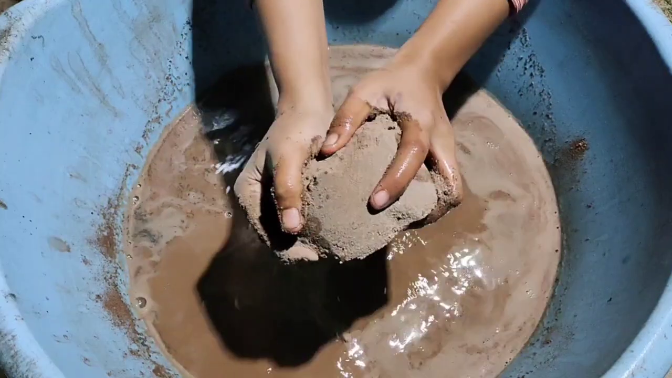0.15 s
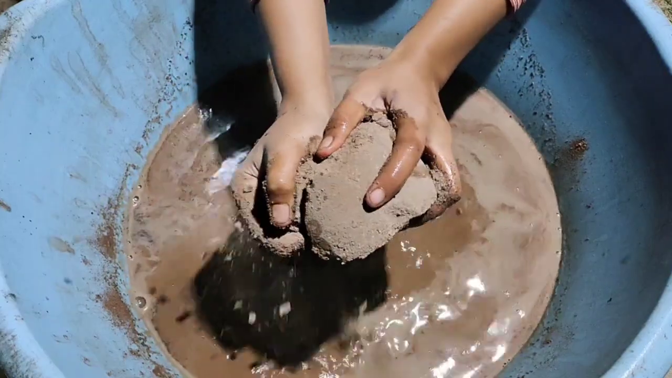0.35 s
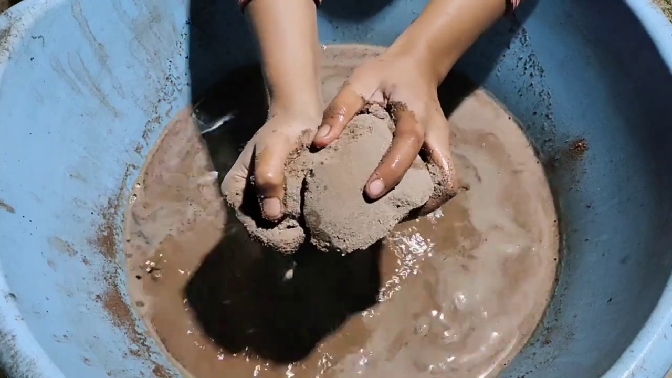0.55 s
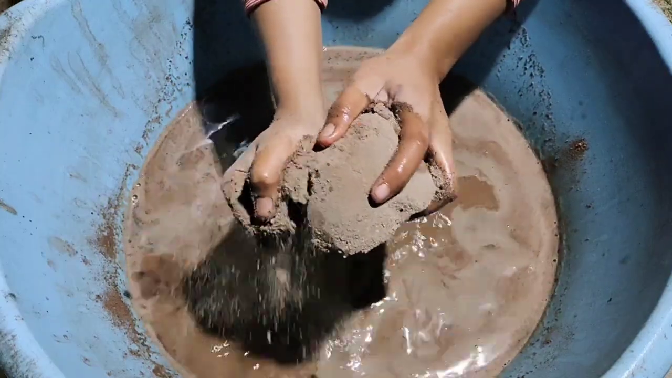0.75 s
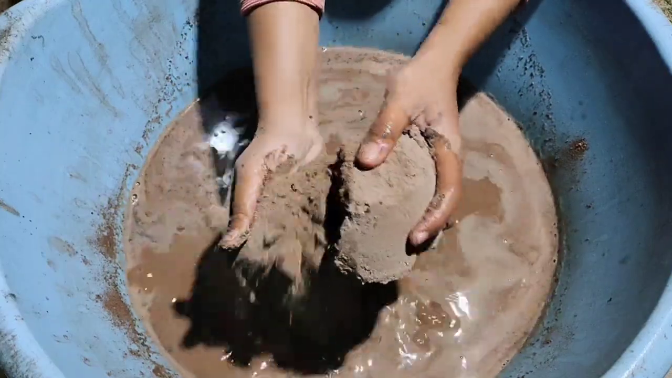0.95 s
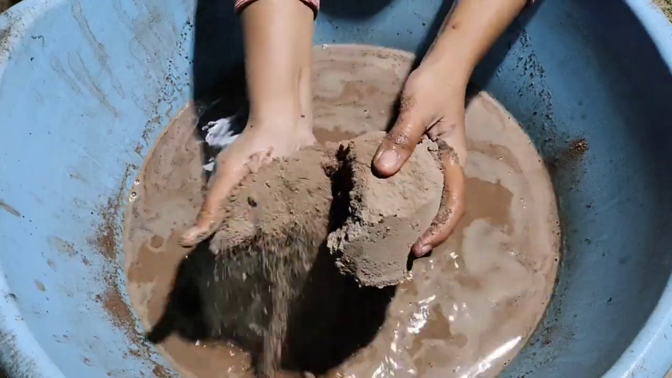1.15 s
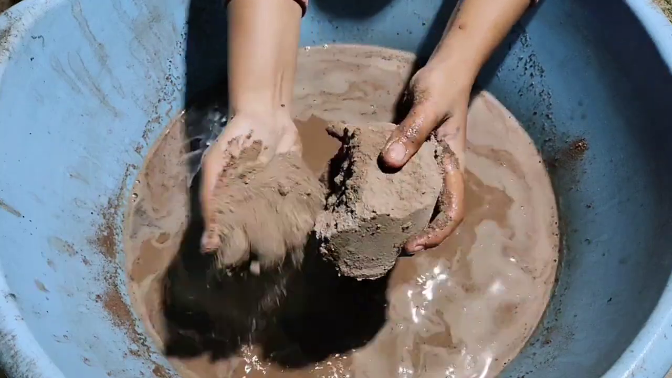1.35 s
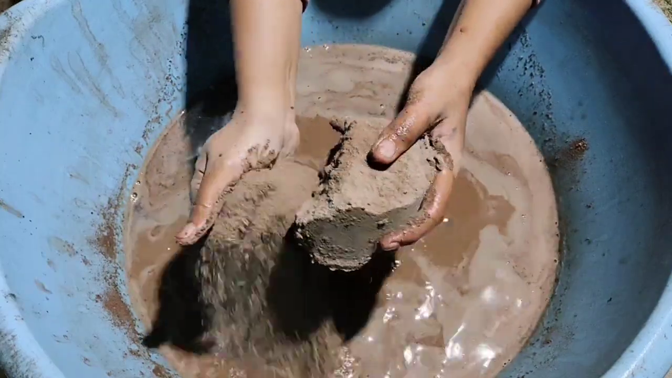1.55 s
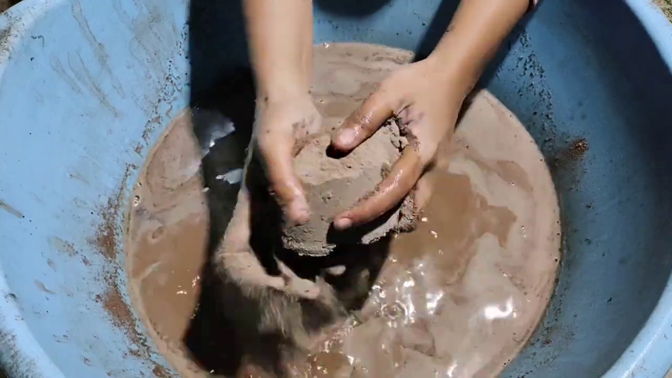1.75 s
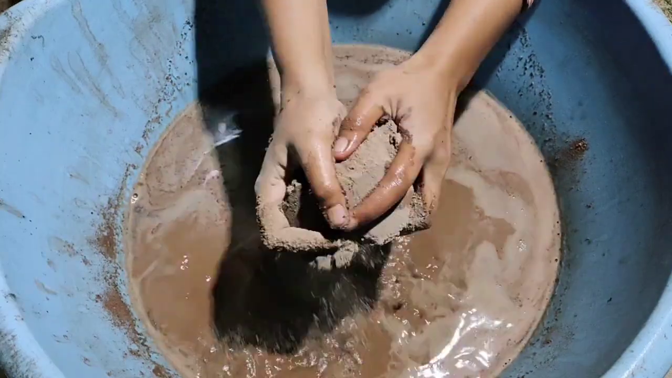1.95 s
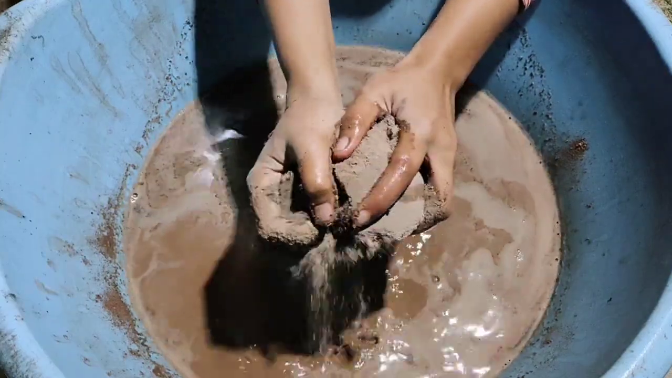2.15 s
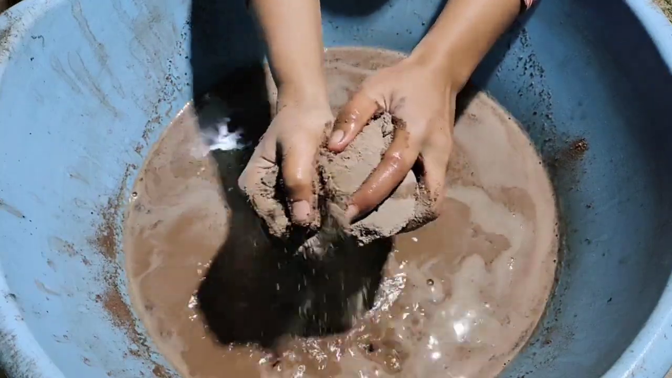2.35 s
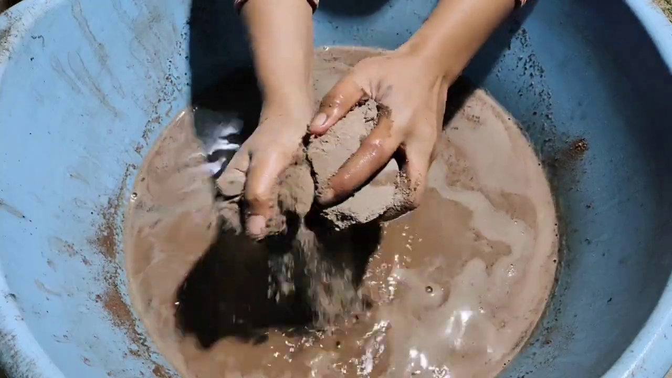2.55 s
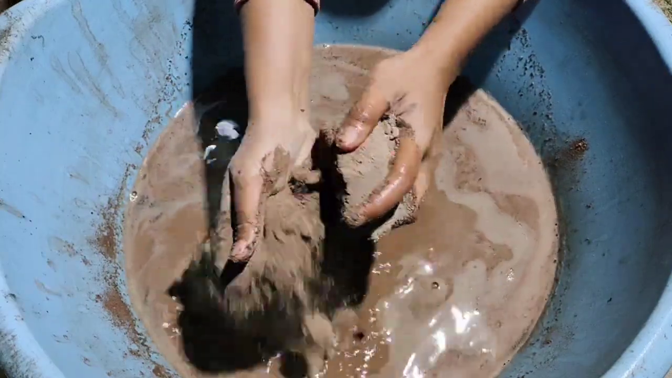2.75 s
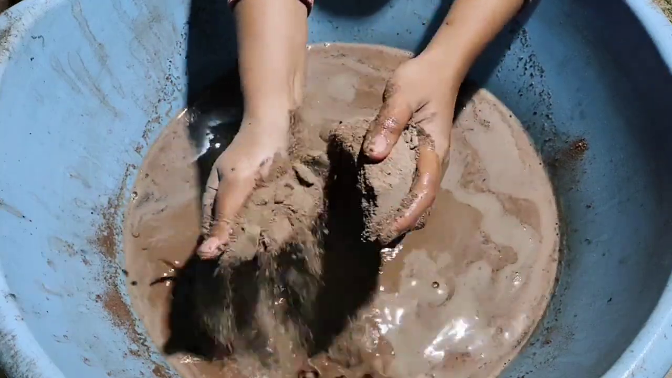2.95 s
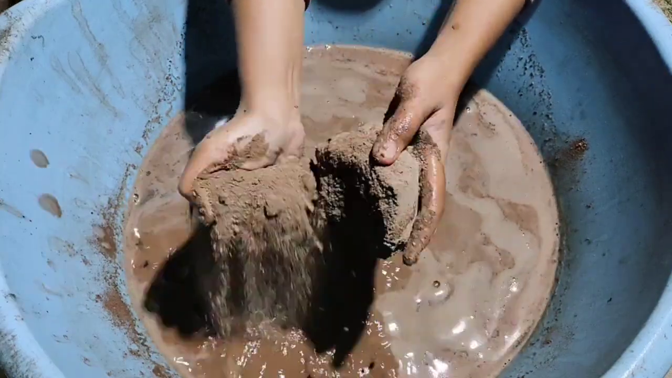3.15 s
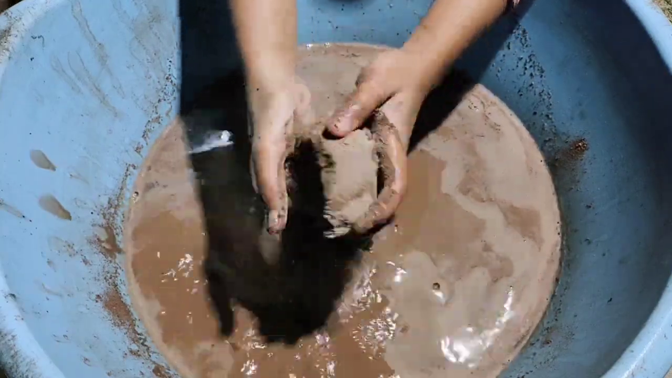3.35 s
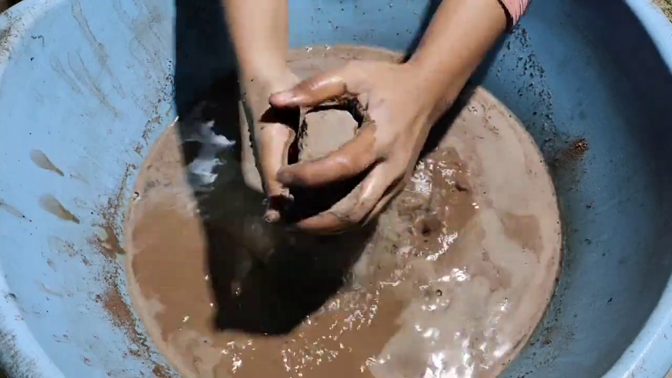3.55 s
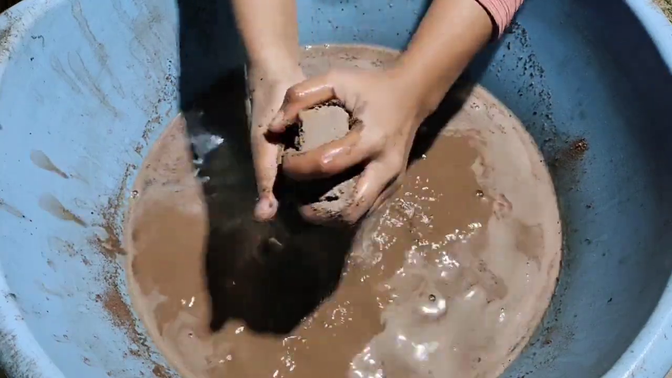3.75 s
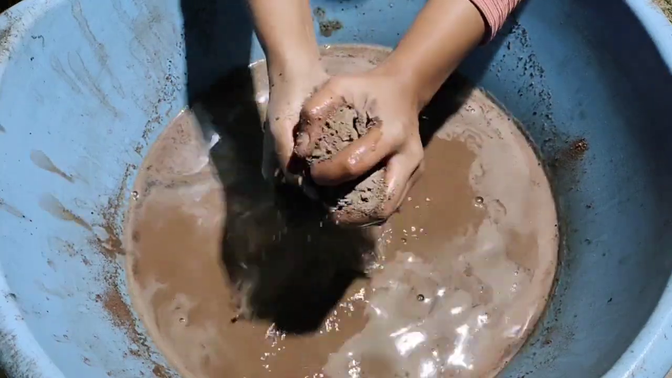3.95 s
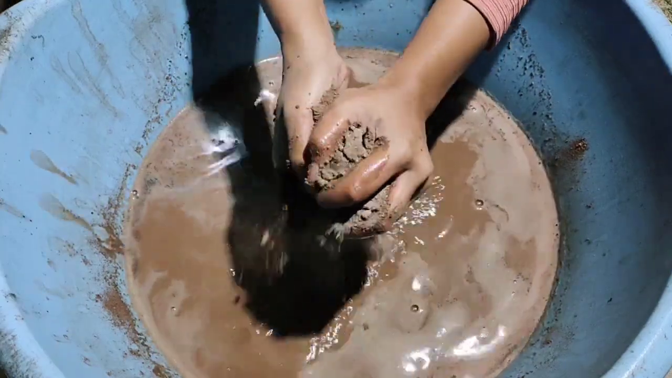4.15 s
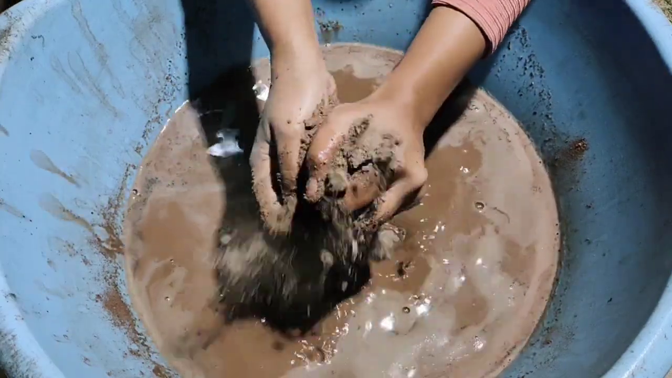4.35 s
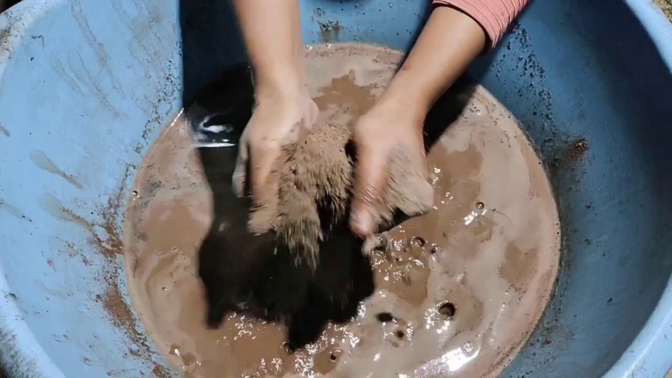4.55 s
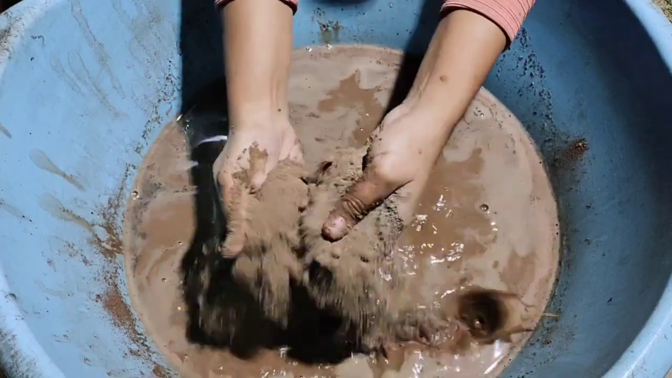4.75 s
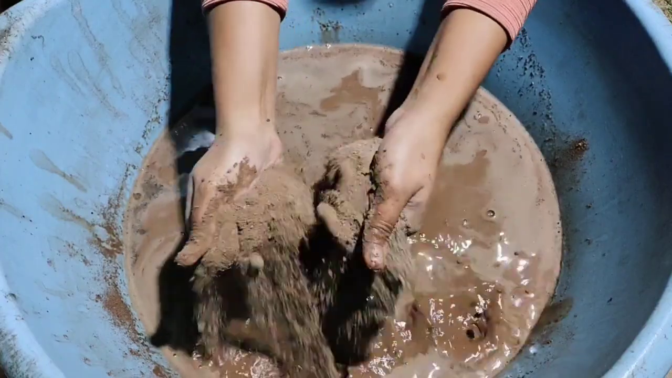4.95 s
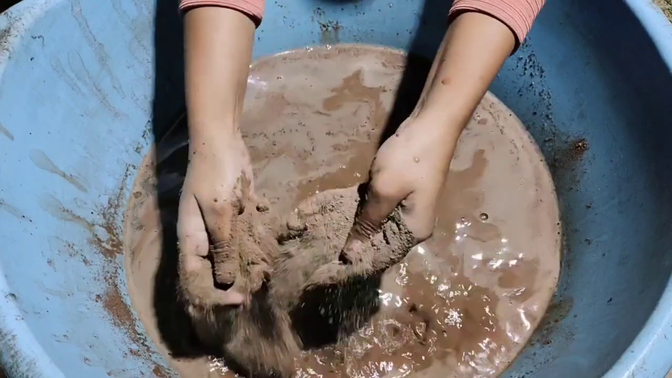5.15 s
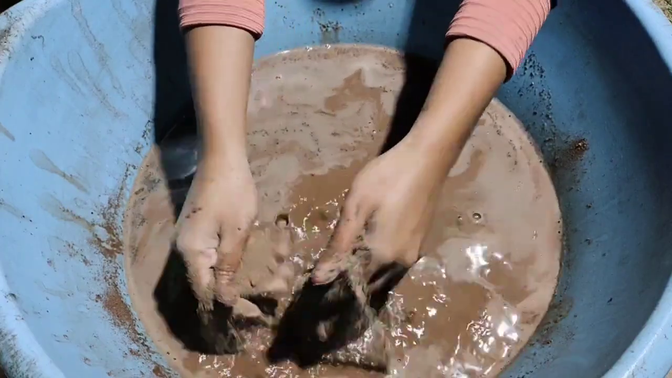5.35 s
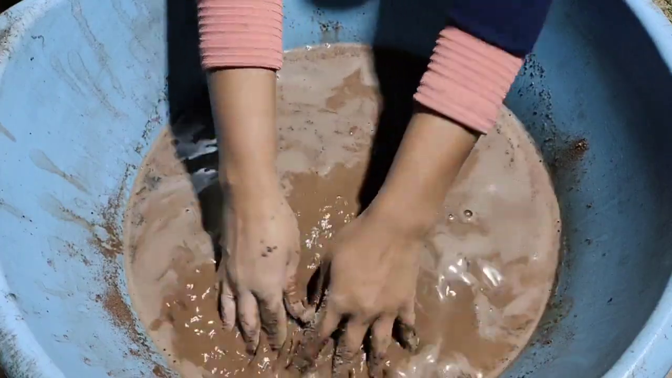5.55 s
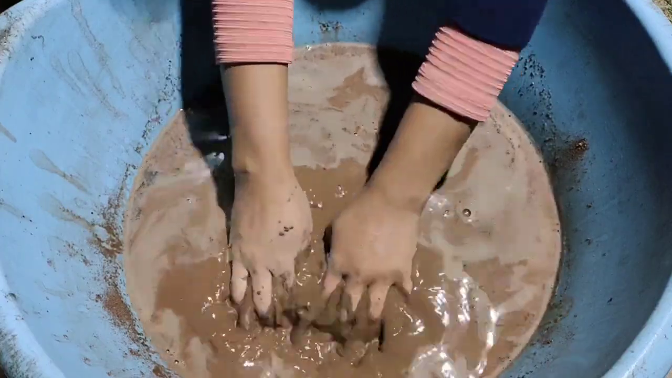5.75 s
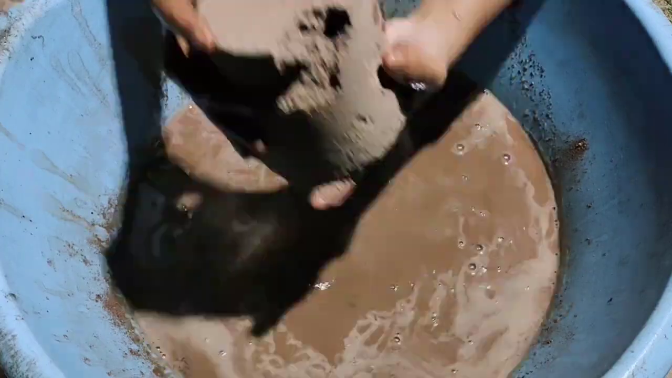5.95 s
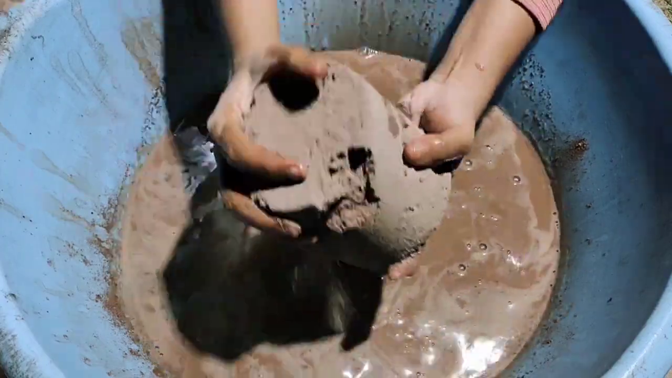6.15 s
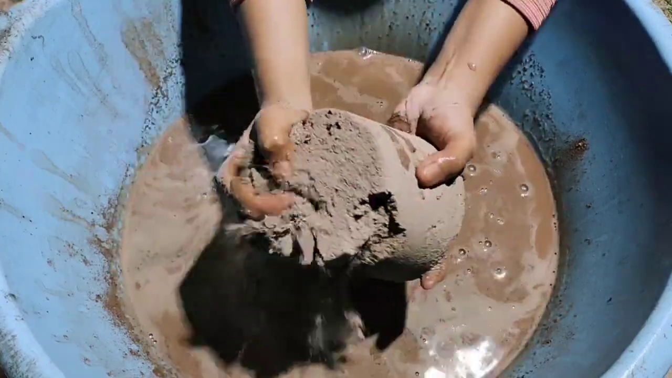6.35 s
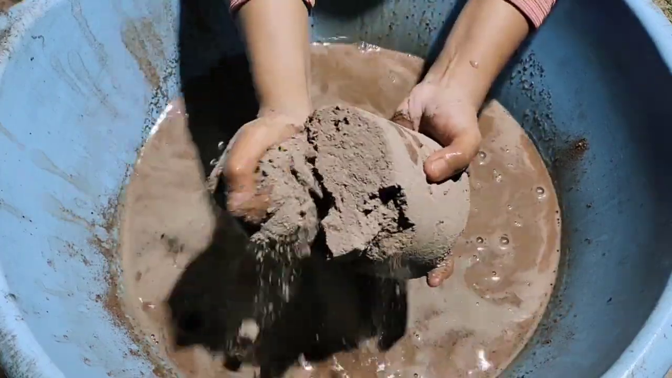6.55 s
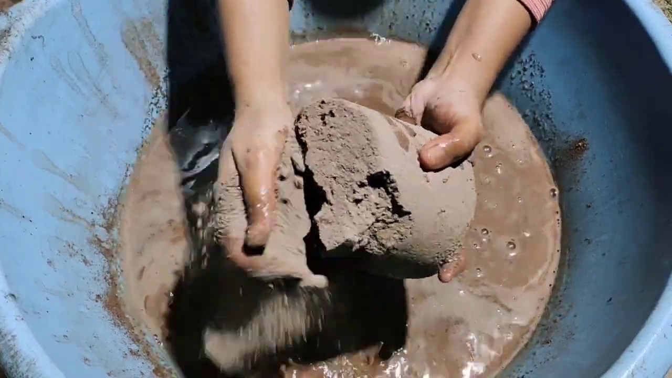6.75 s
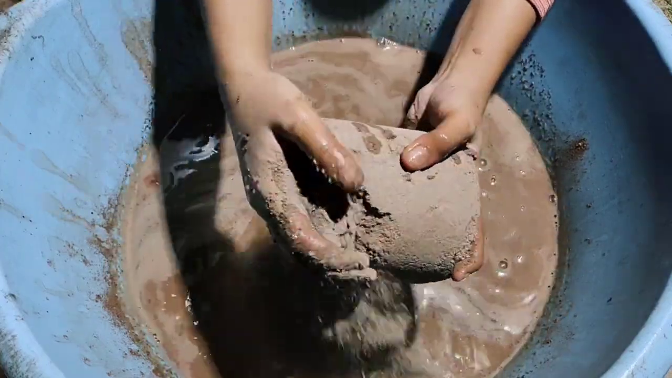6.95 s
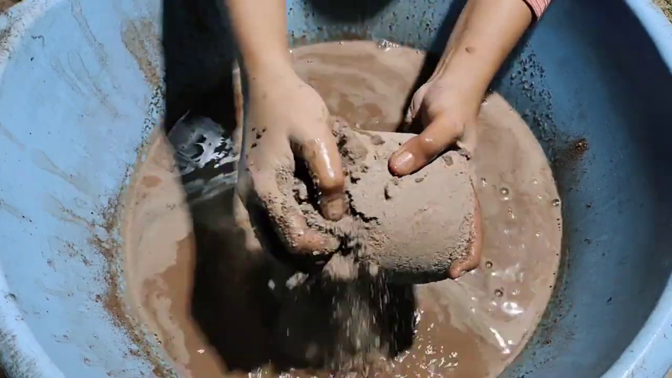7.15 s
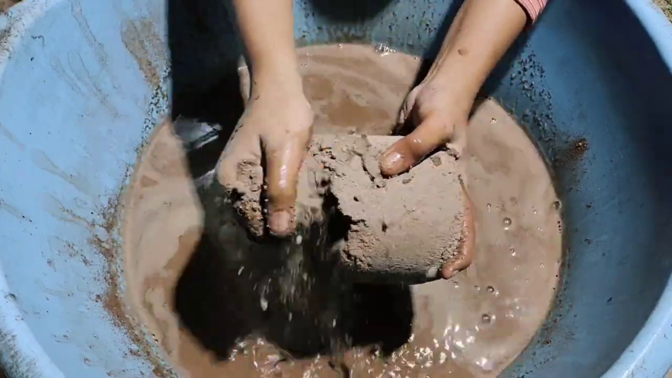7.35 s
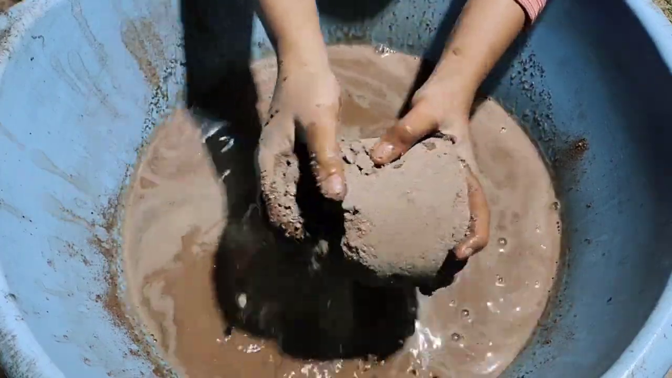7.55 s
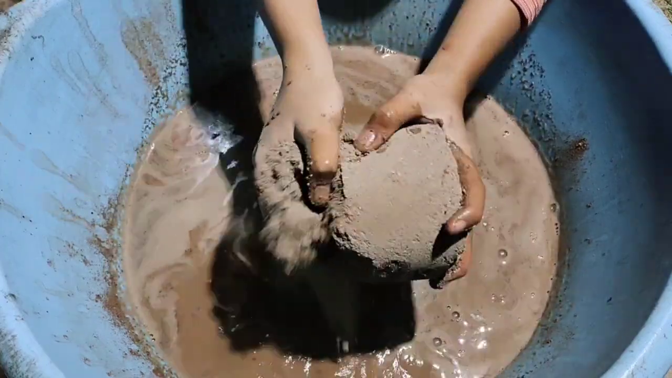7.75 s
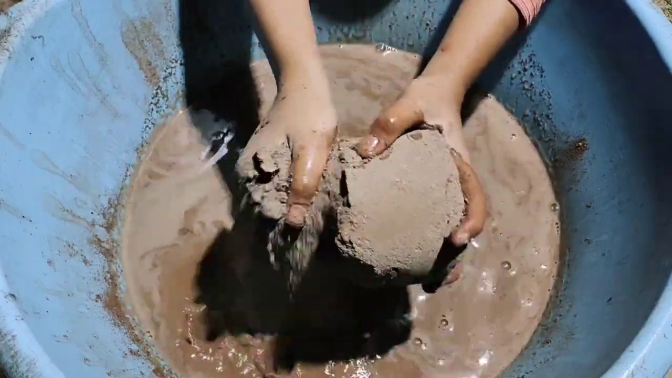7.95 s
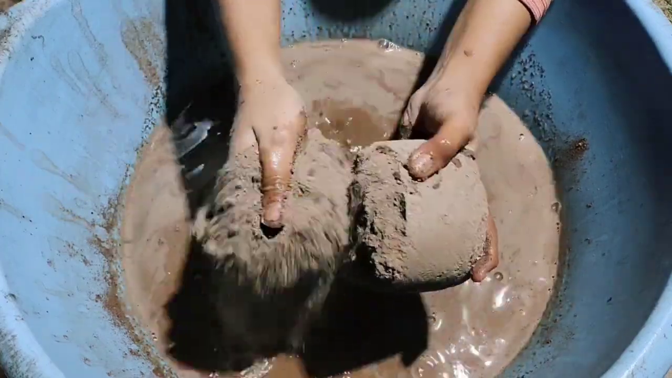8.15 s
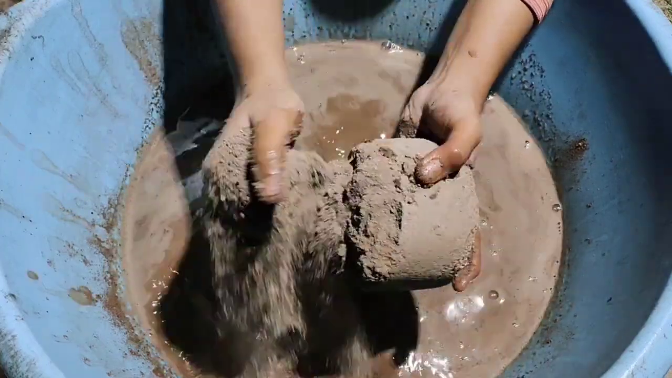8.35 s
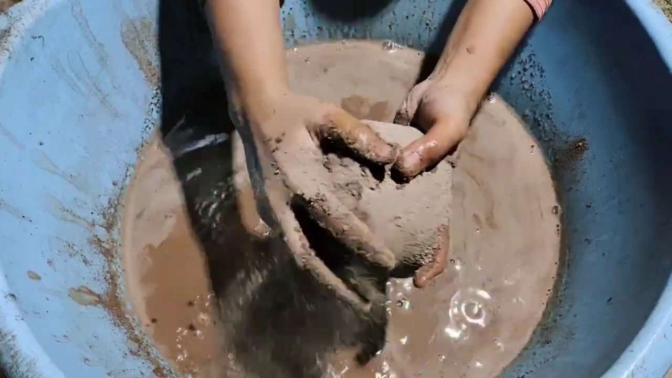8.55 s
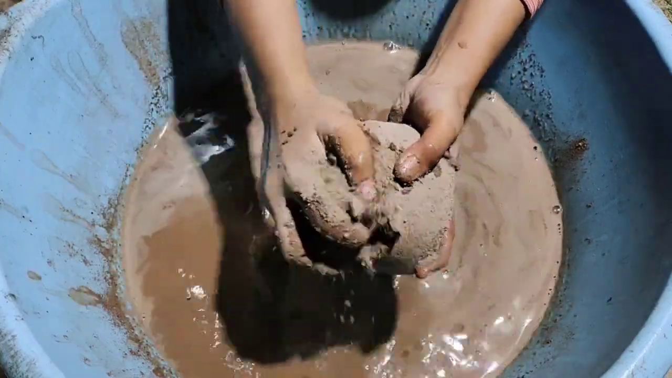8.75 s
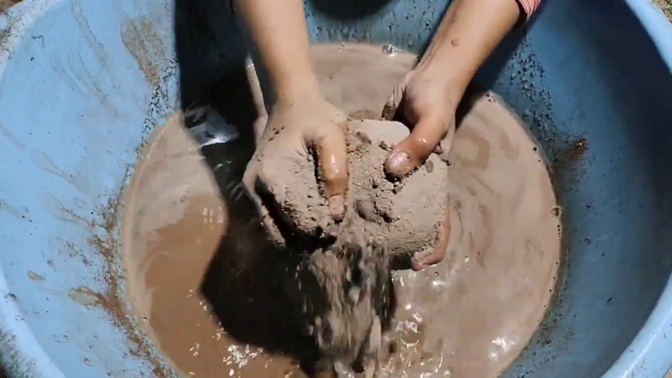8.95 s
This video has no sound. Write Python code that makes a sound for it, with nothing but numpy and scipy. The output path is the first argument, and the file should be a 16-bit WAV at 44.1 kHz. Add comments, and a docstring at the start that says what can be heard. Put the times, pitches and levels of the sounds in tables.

```python
"""Hands crumble lumps of sandy soil over a plastic basin of muddy water, outdoors, near a small microphone.
Sand rasps, slides and cracks in the fingers. Clods plop into the water, crumbs patter on it and trapped
air blips as bubbles; the crumbs and cracks make the basin ring. Once, the hands churn through the water.
A distant rumble, faint air hiss and, at first, a fading engine hum lie underneath."""
import sys
import numpy as np
from scipy import signal
from scipy.fft import rfft, irfft
from scipy.io import wavfile

SR = 44100
rng = np.random.default_rng(int(sys.argv[2]) if len(sys.argv) > 2 else 0)


def transcribe(signal):
    """Save signal, clipped to [-1, 1], as a 16-bit WAV file at the path in sys.argv[1]."""
    frames = np.atleast_2d(signal).T
    limited = np.clip(frames, -1, 1)
    pcm = np.round(limited * 32767).astype(np.int16)
    wavfile.write(sys.argv[1], SR, pcm)


N = 396900
NOW = np.arange(N) / SR


def amp(db):
    return 10 ** (np.asarray(db) / 20)


def rms_one(x):
    return x / np.sqrt(np.mean(x ** 2) + 1e-20)


def columns(table):
    return (column[:, None] for column in np.transpose(table))


def band(x, low_hz, high_hz):
    return signal.sosfilt(signal.butter(2, [low_hz, high_hz], "band", fs=SR, output="sos"), x)


def drift(hz):
    """A smooth random wander of about 1 either way; more hz, faster wander."""
    r = np.exp(-2 * np.pi * hz / SR)
    return rms_one(signal.lfilter([1], [1, -2 * r, r * r], rng.standard_normal(N + SR))[SR:])


def coloured(x, spectrum):
    """Give a sound the tone of an (f/Hz, level/dB) table, at average strength 1."""
    hz, level_db = np.transpose(spectrum)
    grid = np.log(np.fft.rfftfreq(N, 1 / SR) + 1)
    return rms_one(irfft(rfft(x) * amp(np.interp(grid, np.log(hz), level_db)), N))


def ring(clicks, hz, ring_s):
    """Each click starts a tone that fades by 60 dB in ring_s."""
    r, w = amp(-60 / (ring_s * SR)), 2 * np.pi * hz / SR
    return signal.lfilter([0, np.sin(w)], [1, -2 * r * np.cos(w), r * r], clicks + 1e-18)


def grains(per_s, spread_db):
    """Random clicks: many small, a few large."""
    sizes = amp(spread_db * np.minimum(rng.exponential(1, N), 3.5)) * rng.choice([-1, 1], N)
    return sizes * (rng.random(N) < per_s / SR)


def place(times, shapes):
    """Lay one short sound at each time."""
    out = np.zeros(N + shapes.shape[1])
    for s, shape in zip(times, shapes):
        start = round(s * SR)
        out[start:start + len(shape)] += shape
    return out[:N]


def bursts(steady_db, rows, rise_db_per_s=910, fall_db_per_s=318):
    """Loudness in dB: each burst swells, holds and dies away on top of a steady level."""
    grid = np.arange(0, N + 64, 64) / SR
    s, held, peak_db = columns(rows)
    before, after = np.maximum(s - grid, 0), np.maximum(grid - s - np.abs(held), 0)
    shape_db = peak_db - rise_db_per_s * before - fall_db_per_s * after
    power = np.interp(NOW, grid, np.sum(amp(2 * shape_db), axis=0))
    return 10 * np.log10(power + amp(2 * steady_db))


# The hands' steady work between bursts: t/s, rasp level/dB, patter level/dB
HAND_WORK = [(0, -41, -65), (.14, -50.5, -68), (.4, -39, -50.5), (1.0, -42, -37.5), (1.7, -41, -41),
             (1.95, -39, -44), (2.09, -50, -70), (2.45, -38.5, -49.5), (2.7, -38, -36.5), (3.24, -43, -48),
             (3.4, -40, -36.5), (3.62, -43.5, -66), (3.95, -45.5, -48), (4.3, -36.5, -35.5),
             (4.95, -38.5, -34), (5.45, -43, -42.5), (5.72, -54, -54), (5.96, -46, -63), (6.15, -50, -51.5),
             (6.5, -38.5, -40.5), (6.8, -48, -46), (7.1, -41.5, -38), (7.5, -41, -36), (8.25, -41.5, -39),
             (8.599, -38, -29), (8.86, -42.5, -56.5), (9, -36, -32)]
def hand_work():
    """How loudly the busy hands keep sand rasping and crumbs pattering, in dB."""
    s, rasp_db, patter_db = np.transpose(HAND_WORK)
    return np.interp(NOW, s, rasp_db), np.interp(NOW, s, patter_db)


# Fingers rub a burst of sand loose: t/s, hold/s, level/dB
FINGER_RUBS = [(0.074, 0.0056, -37), (.585, 0.045, -29), (.72, 0.13, -39), (1.08, 0.076, -33.5),
               (1.52, 0.057, -37.5), (1.81, 0.031, -36), (2.119, 0.024, -31), (2.305, 0.041, -35),
               (2.88, 0.086, -33), (3.455, 0.041, -34), (4.095, 0.019, -37), (4.265, 0.015, -35),
               (4.57, 0.019, -38), (4.87, 0.016, -31), (6.838, 0.073, -30), (6.96, 0.071, -29),
               (7.15, 0.15, -35), (7.28, 0.03, -37), (7.585, 0.11, -34.5), (7.755, 0.026, -28.5),
               (8.315, 0.15, -35.5), (8.6, 0.023, -35), (8.719, 0.033, -32), (8.91, 0.045, -31.5)]
# The tone of rasping sand: f/Hz, relative level/dB
RASP_TONE = [(500, -10), (1000, 7.5), (2000, 9), (3500, 5), (5000, 6), (9000, 9), (12000, 7.5),
             (16000, 6.5)]
def rasp(steady_db):
    """Sand on skin hisses and clicks in clumps; coarse and fine grains clump partly on their own."""
    edges_hz = (300, 2500, 5000, 9000, 17000)
    together = drift(40)
    sand = 0
    for low, high in zip(edges_hz, edges_hz[1:]):
        clumps = 0.95 * together + 1.2 * drift(60)
        grit = rms_one(grains(700 * amp(3 * clumps), spread_db=5.5))
        hiss = rng.standard_normal(N) * amp(2.2 * clumps)
        sand += band(amp(-2) * grit + hiss, low, high)
    return amp(bursts(steady_db, FINGER_RUBS)) * coloured(sand, RASP_TONE)


# The tone of the outdoor background: f/Hz, relative level/dB
RUMBLE_TONE = [(30, -29), (50, 4), (75, -10.5), (95, 4.5), (106, 4.5), (120, 4), (260, -7.5), (360, -16.5),
               (700, -15), (2000, -54), (6000, -33.5), (16000, -23.5)]
def rumble(level_db=-41):
    """A distant rumble with faint air hiss: deep, almost steady noise."""
    return amp(level_db + 0.16 * drift(9.3)) * coloured(rng.standard_normal(N), RUMBLE_TONE)


# A far engine hums and fades: t/s, firing rate f/Hz, lowest tone's level/dB
ENGINE_HUM = [(0, 36.64, -44.5), (.3, 36.7, -44.5), (.68, 39.35, -44), (1.4, 38.2, -63)]
def engine(step_db=-2.5):
    """The engine's firing makes wavering tones at 2 to 7 times its rate, each a step quieter."""
    s, hz, level_db = np.transpose(ENGINE_HUM)
    firings = np.cumsum(np.interp(NOW, s, hz)) / SR
    hum = 0
    for multiple in range(2, 8):
        strength = amp(step_db * (multiple - 2) + 2.5 * drift(2.8))
        hum += strength * np.sin(2 * np.pi * (multiple * firings + rng.random()))
    return np.sqrt(2) * amp(np.interp(NOW, s, level_db, right=-120)) * hum


# A palm smooths the lump: t/s, hold/s, level/dB
PALM_STROKES = [(.175, 0.021, -35), (3.83, 0.02, -33.5), (3.991, 0.031, -35), (4.095, 0.032, -37),
                (6.238, 0.027, -37), (6.339, 0.011, -28.5)]
# The tone of a stroke: f/Hz, relative level/dB
STROKE_TONE = [(400, -0.5), (900, -0.5), (2000, 2), (4000, -5), (6000, -1.5), (9000, 1), (16000, -12)]
def strokes():
    """Packed sand slides under the palm with an even, duller hiss."""
    level_db = bursts(-90, PALM_STROKES) + 1.5 * drift(70)
    return amp(level_db) * coloured(rng.standard_normal(N), STROKE_TONE)


# Air trapped by falling crumbs: t/s, level/dB, f/Hz
AIR_BUBBLES = [(0.306, -25.5, 2400), (0.371, -11.5, 1120), (0.432, -11, 1020), (0.72, -14.5, 2150),
               (0.755, -10, 1007), (0.821, -11.5, 1850), (0.878, -13, 1050), (1.089, -18.5, 1870),
               (1.169, -12.5, 813), (1.2, -13, 2180), (1.339, -22, 1260), (1.384, -23, 1820),
               (1.399, -14, 1720), (1.416, -14.5, 995), (1.478, -19.5, 920), (1.579, -22.5, 2480),
               (1.611, -22, 1240), (1.813, -19, 3300), (1.858, -18, 1230), (1.957, -22, 794),
               (2.041, -20, 1040), (2.136, -15.5, 1120), (2.342, -16.5, 2220), (2.551, -18, 2960),
               (2.565, -12, 1140), (2.775, -13.5, 1610), (2.903, -13.5, 1310), (3.026, -12, 827),
               (3.065, -17.5, 1494), (3.269, -17.5, 1720), (3.333, -15.5, 1105), (3.383, -16, 1110),
               (3.43, -18.5, 1380), (3.455, -14, 1400), (3.527, -12.5, 880), (3.729, -26, 1200),
               (4.274, -11.5, 1920), (4.469, -12.5, 805), (4.529, -14, 1830), (4.739, -7, 850),
               (4.747, -9, 1175), (4.894, -16.5, 3520), (4.915, -16, 1440), (4.986, -13.5, 1990),
               (5.075, -14.5, 1320), (5.018, -16, 803), (5.1, -23, 1690), (5.174, -14.5, 1355),
               (5.258, -22, 1070), (5.343, -24, 1340), (5.529, -22.5, 1040), (5.593, -12.5, 1830),
               (5.788, -27, 5500), (5.841, -25, 4860), (6.448, -14, 1580), (6.6, -13, 1420),
               (6.787, -20.5, 2300), (6.899, -14.5, 1140), (7.112, -11, 854), (7.284, -14.5, 2100),
               (7.359, -10, 830), (7.504, -24, 1500), (7.604, -16, 1050), (7.653, -12.5, 884),
               (7.85, -17.5, 990), (7.902, -12.5, 980), (7.961, -12.5, 773), (8.06, -13, 2040),
               (8.312, -14.5, 2010), (8.448, -16.5, 1320), (8.489, -13.5, 1470), (8.537, -22, 1660),
               (8.89, -25, 1360)]
def bubbles():
    """A bubble rings briefly, wobbling and rising in pitch; a quieter one follows as the splash falls."""
    s, peak_db, hz = columns(AIR_BUBBLES)
    t = np.arange(1800) / SR
    wobble = signal.lfilter([.03], [1, -.97], rng.standard_normal((len(s), len(t))))
    wobble = 7.24 * (wobble - wobble[:, :1])
    second_s = s + rng.uniform(0.0095, 0.0205, s.shape)
    second_hz = hz * rng.uniform(0.802, 1.437, s.shape)
    second_db = peak_db - rng.uniform(5, 12, s.shape)
    out = 0
    for start, pitch, level_db in ((s, hz, peak_db), (second_s, second_hz, second_db)):
        tone = np.sin(2 * np.pi * pitch * (t + 0.23 * t ** 2) + wobble)
        ring_s = 0.007 + 22 / pitch
        out += place(start[:, 0], amp(level_db - 60 * t / ring_s) * tone)
    return out


# Grit cracks or slaps the water: t/s, level/dB, relative treble level/dB
GRIT_CRACKS = [(0.3688, -5.0, -10.0), (0.3772, -11, -14), (0.4053, -12, -25), (0.4472, -14.0, 5.0),
               (0.4681, -10.0, -7.0), (0.7814, -14.0, 3.0), (0.7983, -17.0, 10.0), (0.8192, -5.0, -10.0),
               (0.9004, -8.0, -13.0), (0.9289, -2.0, -11.0), (0.9391, -11.0, -7.0), (1.064, -16.0, 6.0),
               (1.1031, -12, -17), (1.1684, -4.0, -12.0), (1.1773, -8.0, -1.0), (1.1909, -6.0, -13.0),
               (1.2019, -10.0, 5.0), (1.4778, -12.0, 1.0), (1.5273, -14, -21), (1.5932, -10.0, -16.0),
               (1.6843, -16.0, 2.0), (1.8605, -16.0, 1.0), (1.8802, -12.0, 8.0), (1.8851, -14.0, 8.0),
               (1.9078, -9.0, -5.0), (1.9464, -13, -23), (1.958, -7.0, -3.0), (2.1517, -11, -21),
               (2.161, -7.0, -4.0), (2.3407, -7.0, -7.0), (2.347, -8.0, -12.0), (2.551, -8.0, -12.0),
               (2.5637, -8.0, -5.0), (2.5848, -6.0, -3.0), (2.6894, -22.0, 11.0), (2.7474, -13, -19),
               (2.7787, -15.0, 1.0), (2.7896, -6.0, -10.0), (2.8069, -11, -21), (2.9283, -6.0, -6.0),
               (2.9655, -5.0, -17.0), (2.9811, -10.0, -9.0), (2.9901, -10, -28), (3.0262, -3.0, -14.0),
               (3.0804, -14.0, 0.0), (3.2694, -12.0, 1.0), (3.3325, -13.0, -8.0), (3.3879, -10.0, 1.0),
               (3.4557, -9.0, -15.0), (3.5275, -17.0, -8.0), (3.5705, -16.0, -8.0), (4.1262, -14.0, 0.0),
               (4.447, -14, -10), (4.4698, -5.0, -6.0), (4.5, -13.0, 6.0), (4.5291, -7.0, -13.0),
               (4.6622, -5.0, 1.0), (4.7285, -16.0, 2.0), (4.7389, -2.0, -24.0), (4.7885, -9.0, -1.0),
               (4.9546, -8.0, -16.0), (5.0222, -12.0, 0.0), (5.1011, -9.0, -18.0), (5.1757, -3.0, -22.0),
               (5.3447, -14, -17), (5.5834, -8.0, -18.0), (5.5874, -11.0, -20.0), (5.5922, -9.0, -14.0),
               (5.6562, -13.0, -21.0), (6.4497, -9.0, -14.0), (6.5999, -4.0, -14.0), (6.6033, -2.0, -13.0),
               (6.6219, -2.0, -18.0), (6.6716, -12.0, -21.0), (6.788, -16.0, -10.0), (6.8338, -15.0, -1.0),
               (6.8748, -8.0, -5.0), (6.9245, -10.0, -14.0), (6.9448, -12.0, -1.0), (6.9675, -3.0, -6.0),
               (6.9749, -9.0, 2.0), (6.9955, -9, -18), (7.0149, -11, -22), (7.0352, -2.0, -8.0),
               (7.0578, -5.0, -5.0), (7.1111, -7.0, -16.0), (7.1284, -10.0, -15.0), (7.1554, -10, -20),
               (7.1786, -12, -17), (7.2842, -7.0, -17.0), (7.3601, -5.0, -17.0), (7.3782, -2.0, -25.0),
               (7.4666, -24.0, 8.0), (7.5487, -9.0, -4.0), (7.5889, -27.0, 13.0), (7.6022, -6.0, -4.0),
               (7.6945, -12.0, -2.0), (7.7688, -16.0, 5.0), (7.7917, -13, -11), (7.8683, -6.0, -12.0),
               (7.9617, -3.0, -23.0), (7.9881, -11.0, -3.0), (8.0783, -10, -23), (8.1367, -17.0, 9.0),
               (8.2055, -6.0, -14.0), (8.214, -2.0, -12.0), (8.2519, -19.0, 3.0), (8.3523, -9.0, -16.0),
               (8.377, -13.0, -1.0), (8.3633, -12, -14), (8.3896, -15.0, 10.0), (8.4045, -9.0, -4.0),
               (8.4388, -10.0, -18.0), (8.4459, -8, -23), (8.4631, -11, -10), (8.49, -7.0, -20.0),
               (8.5072, -8, -21), (8.6298, -12, -23), (8.6721, -14.0, -4.0)]
def cracks(push_s=.00015, snap_s=.00006):
    """Pressure builds and snaps back, leaving a little dying noise; fine grit is brighter."""
    s, peak_db, treble_db = columns(GRIT_CRACKS)
    t = np.arange(400) / SR - push_s
    snap = np.where(t < 0, 0.37 * (1 + t / push_s) ** 2, -np.exp(-t / snap_s))
    tail = (.2 * np.exp(-t / .0004) + .06 * np.exp(-t / .002)) * (t > 0)
    burst = snap + rng.standard_normal((len(s), len(t))) * tail
    body, treble = band(burst, 600, 8500), band(burst, 10500, 15400)
    body, treble = (part / np.abs(part).max(axis=1, keepdims=True) for part in (body, treble))
    return place(s[:, 0] - push_s, amp(peak_db) * (body + amp(treble_db) * treble))


# The basin's own notes: f/Hz, relative level/dB, ring time/s
BASIN_NOTES = [(277, -12.5, 0.11), (500, -6, 0.045), (552, -5, 0.045), (836, -9, 0.009)]
def basin(strikes):
    """Small knocks set the air and walls of the basin ringing."""
    return sum(amp(level_db) * ring(strikes, hz, ring_s) for hz, level_db, ring_s in BASIN_NOTES)


# Clods land in the water: t/s, level/dB, plop f/Hz, relative thump level/dB
CLOD_LANDINGS = [(0.37, -24, 550, -25), (0.432, -21, 553, -24), (0.59, -22, 490, 6),
                 (0.753, -20.5, 550, -7), (0.901, -17.5, 553, -29), (0.94, -19.5, 540, -22),
                 (1.179, -3.5, 517, -11), (1.476, -24, 556, -21), (1.959, -12, 527, -22),
                 (2.161, -18.5, 538, -15), (2.39, -35, 493, 11), (2.642, -21.5, 540, -11),
                 (2.959, -16.5, 530, -6), (3.029, -17, 525, -4), (3.066, -22.5, 537, -32),
                 (3.27, -29, 550, -23), (3.332, -22, 536, -27), (3.388, -18, 540, -21),
                 (3.481, -20.5, 615, -30), (3.571, -20.5, 638, -34), (4.47, -2.5, 507, -20),
                 (4.74, -12, 514, -28), (5.177, -19.5, 545, -3.5), (5.625, -22, 460, -6),
                 (6.604, -12, 550, -10), (6.902, -22.5, 530, -27), (7.036, -21, 526, -19),
                 (7.112, -16, 552, -4.5), (7.239, -22, 453, -13), (7.363, -9, 542, -14),
                 (7.381, -9, 482, -11.5), (7.528, -16, 532, -15), (7.606, -14.5, 504, -31),
                 (7.695, -11.5, 491, -32), (7.851, -21, 500, -8), (7.87, -16.5, 520, -23),
                 (7.905, -18, 524, -19), (7.965, -8.5, 528, -11), (8.024, -9, 502, -31.5),
                 (8.076, -16, 547, -32), (8.175, -20.5, 554, -21.5), (8.206, -24.5, 563, -4),
                 (8.447, -22, 510, -25)]
def clods(thump_hz=260, lead_s=.0015):
    """A clod slaps the water and punches a hole that plops; heavier clods add a low thump."""
    s, level_db, hz, thump_db = columns(CLOD_LANDINGS)
    t = np.arange(3000) / SR
    swell_and_fade = (1 - np.exp(-t / 0.0018)) / (1 + (t / 0.0077) ** 2.45)
    waver = np.cumsum(rng.standard_normal((len(s), len(t))), axis=1)   # a ragged hole: unsteady pitch
    plop = np.sin(2 * np.pi * hz * t + .025 * waver) * swell_and_fade
    thump = np.sin(2 * np.pi * thump_hz * t) * amp(thump_db - 60 * t / 0.052)
    slap = band(rng.standard_normal((len(s), len(t))) * np.exp(-t / 0.00077), 600, 2500)
    starts = s[:, 0] - lead_s   # the blow comes just before the plop peaks
    return place(starts, amp(level_db) * (plop + thump + amp(6) * slap))


def patter():
    """Crumbs ring briefly in the water at a pitch set by their size; harder grit lands with a dry tick."""
    clumps = drift(50)
    clicks = grains(340 * amp(3 * clumps), spread_db=3.6)
    sizes = rng.integers(0, 16, N)
    blips = 0
    for size, hz in enumerate(np.geomspace(940, 6000, 16)):
        ringing = ring(clicks * (sizes == size), hz, 16 / hz)
        swelling = ring(ringing, hz, 3 / hz)   # ringing twice softens the start
        blips += rms_one(swelling) * hz ** -0.35
    ticks = band(grains(110 * amp(3 * clumps), spread_db=3), 2600, 6500)
    return rms_one(blips) + amp(-9) * rms_one(ticks)


def drops(per_s=65, ring_cycles=3.5):
    """Single drops land at random: a tick, then a short blip that slides up in pitch."""
    when, pitch, softness, tickiness = columns(rng.random((round(per_s * N / SR), 4)))
    hz = 1200 * 5.7 ** pitch
    t = np.arange(900) / SR
    swell_and_fade = (1 - np.exp(-t / 0.00076)) * amp(-60 * t * hz / ring_cycles)
    blip = np.sin(2 * np.pi * hz * (t + 7.1 * t ** 2)) * swell_and_fade
    tick = rng.standard_normal((len(when), len(t))) * np.exp(-t / 0.0006)
    shapes = amp(-18 * softness) * (blip + 0.14 * tickiness * tick)
    return rms_one(place(when[:, 0] * NOW[-1], shapes))


# Showers of crumbs reach the water: t/s, hold/s, level/dB
CRUMB_SHOWERS = [(.585, 0.026, -38), (0.746, 0.15, -35), (1.168, 0.031, -30), (1.519, 0.014, -31.5),
                 (1.875, 0.013, -31), (2.121, 0.054, -31), (2.311, 0.095, -35), (2.549, 0.017, -35),
                 (2.776, 0.066, -31.5), (2.9, 0.093, -31), (3.27, 0.024, -42), (3.43, 0.11, -36.5),
                 (3.725, 0.035, -45), (4.57, 0.01, -29.5), (4.735, 0.14, -37), (5.586, 0.066, -35.5),
                 (6.44, 0.015, -30), (6.596, 0.013, -30.5), (6.837, .2, -32.5), (7.109, 0.075, -33),
                 (7.329, 0.018, -27.5), (7.6, 0.054, -30), (7.85, .35, -34), (8.891, .11, -36.5)]
def showers(steady_db):
    """The patter and the quieter drops swell together with each shower."""
    level_db = bursts(steady_db, CRUMB_SHOWERS, rise_db_per_s=1006, fall_db_per_s=404)
    return amp(level_db) * (patter() + amp(-8.5) * drops())


# Hands push through the water: t/s, level/dB
WATER_RUSH = [(5.4, -80), (5.55, -45), (5.7, -37.5), (5.85, -35), (5.961, -35), (5.962, -80)]
# The tone of churning water: f/Hz, relative level/dB
RUSH_TONE = [(200, -1.5), (450, -4.5), (1200, -3), (2500, -9.5), (4500, -19), (9000, -55)]
def rush():
    """Water churns round the fingers with a soft, lumpy noise."""
    s, level_db = np.transpose(WATER_RUSH)
    churn = coloured(rng.standard_normal(N), RUSH_TONE)
    return amp(np.interp(NOW, s, level_db, left=-90) + 1.2 * drift(41)) * churn


def hush(start_s=5.958, end_s=5.972, dip_db=-13):
    """A volume curve that dips for a moment."""
    return amp(np.interp(NOW, [start_s - .002, start_s, end_s - .008, end_s], [0, dip_db, dip_db, 0]))


def scene():
    """Sand, water and basin over the outdoor background, in one channel."""
    rasp_db, patter_db = hand_work()
    sand = rasp(rasp_db) + strokes()
    background = rumble() + engine()
    strikes = cracks() + showers(patter_db)
    water = bubbles() + clods() + rush()
    mix = sand + background + strikes + amp(-26) * basin(strikes) + water
    return (mix * hush())[None]


def record(dry, port_hz=7016, width_hz=670, lift_db=8.53, bass_cut_hz=75, top_cut_hz=15480):
    """The microphone's opening rings in the treble; deep bass is lost, peaks are rounded, the top is cut."""
    r, w = np.exp(-np.pi * width_hz / SR), 2 * np.pi * port_hz / SR
    gain = (1 - r * r) / 2
    port_ring = signal.lfilter([gain, 0, -gain], [1, -2 * r * np.cos(w), r * r], dry)
    bass_cut = signal.butter(4, bass_cut_hz, "high", fs=SR, output="sos")
    top_cut = signal.ellip(12, .5, 80, top_cut_hz, fs=SR, output="sos")
    rounded = np.tanh(signal.sosfilt(bass_cut, dry + amp(lift_db) * port_ring))
    return signal.sosfilt(top_cut, rounded)


dry = scene()
out = record(dry)
transcribe(out)
```